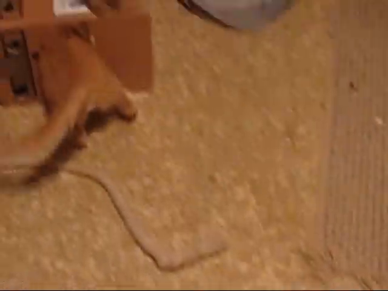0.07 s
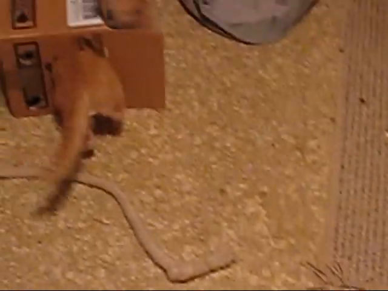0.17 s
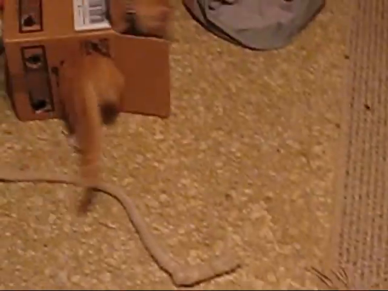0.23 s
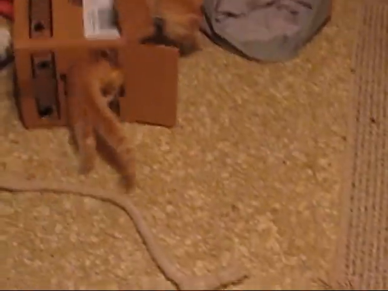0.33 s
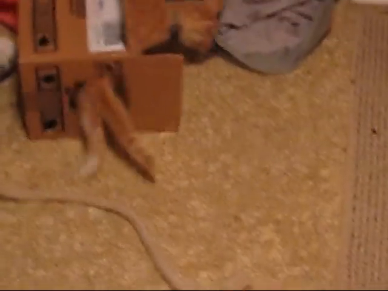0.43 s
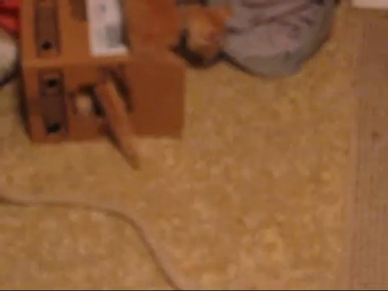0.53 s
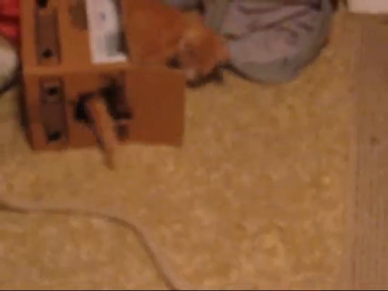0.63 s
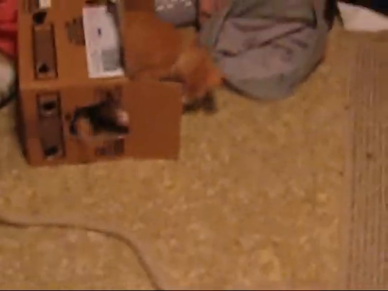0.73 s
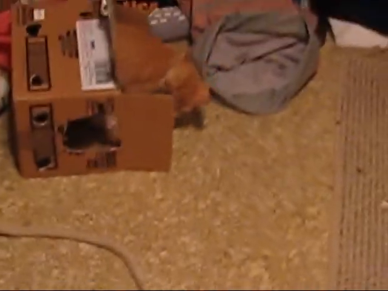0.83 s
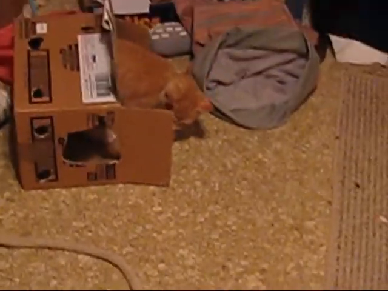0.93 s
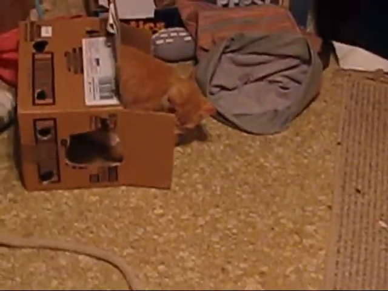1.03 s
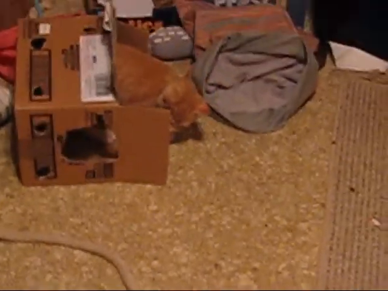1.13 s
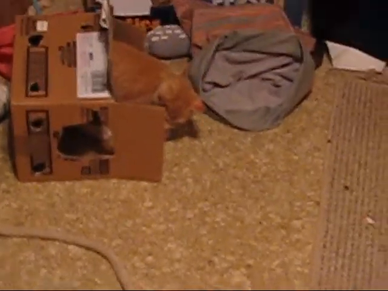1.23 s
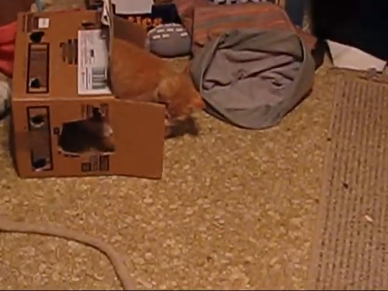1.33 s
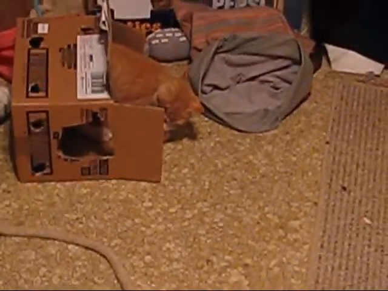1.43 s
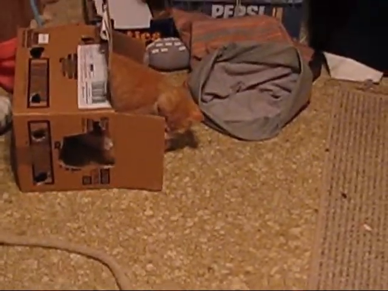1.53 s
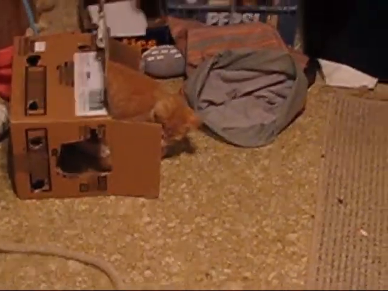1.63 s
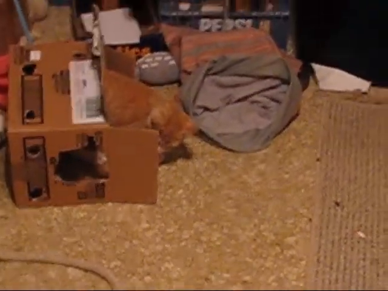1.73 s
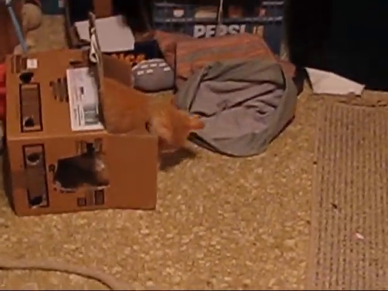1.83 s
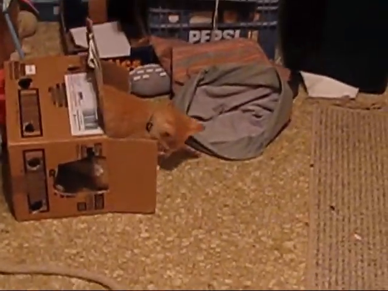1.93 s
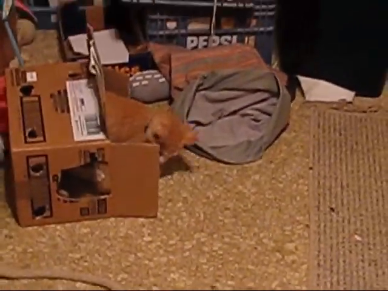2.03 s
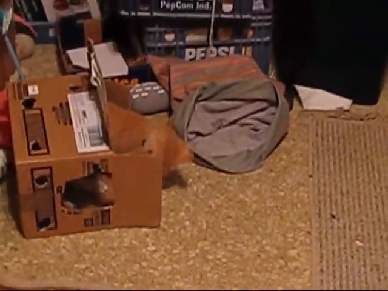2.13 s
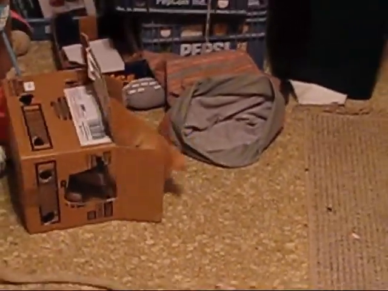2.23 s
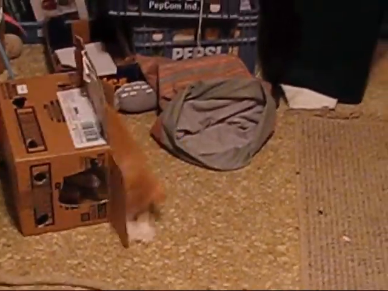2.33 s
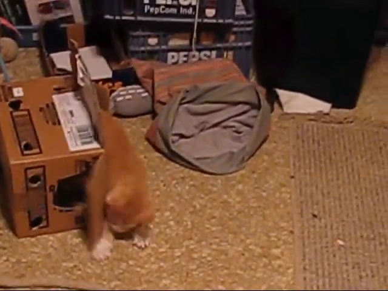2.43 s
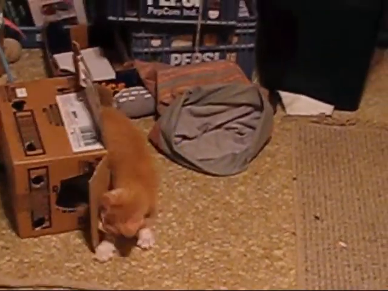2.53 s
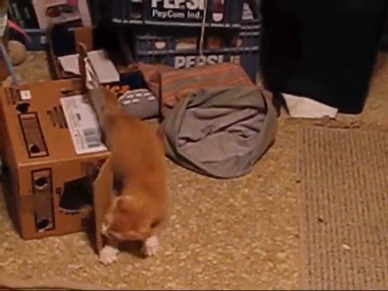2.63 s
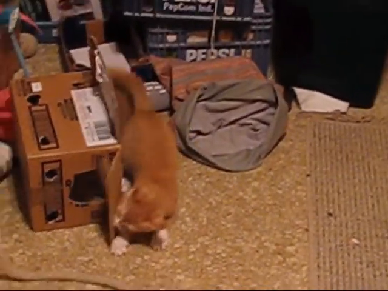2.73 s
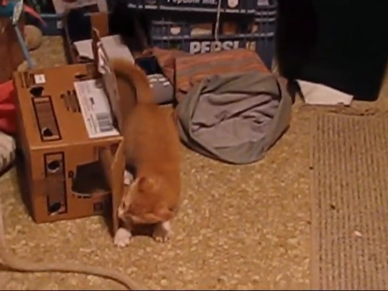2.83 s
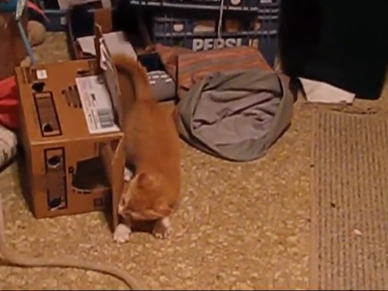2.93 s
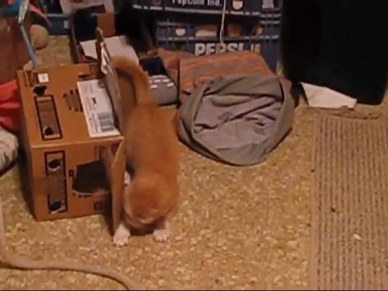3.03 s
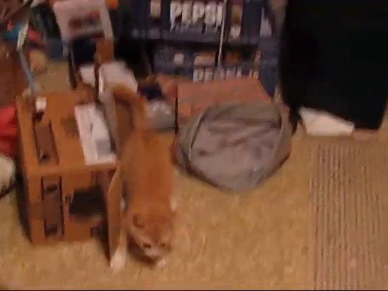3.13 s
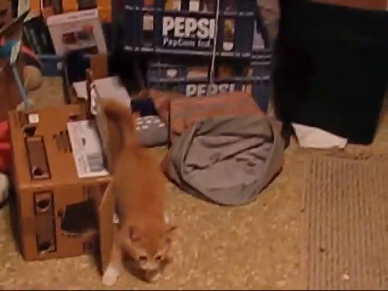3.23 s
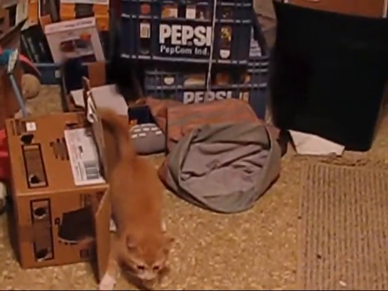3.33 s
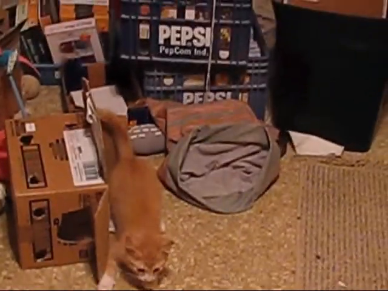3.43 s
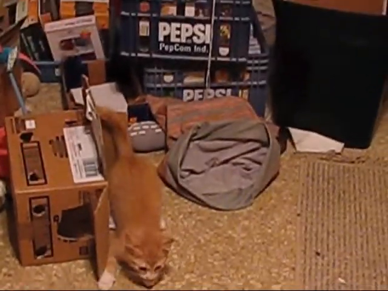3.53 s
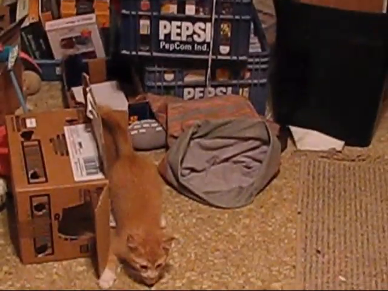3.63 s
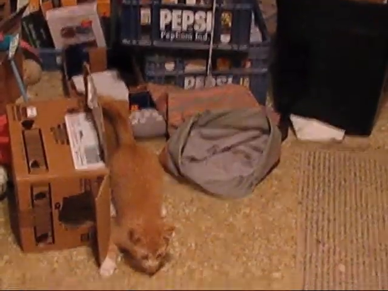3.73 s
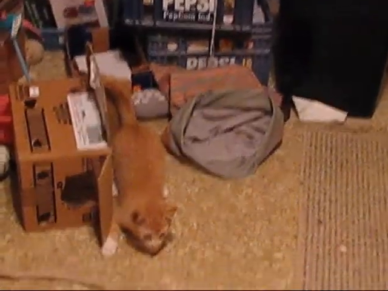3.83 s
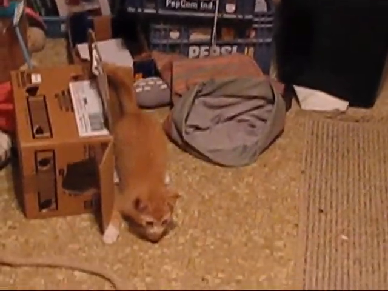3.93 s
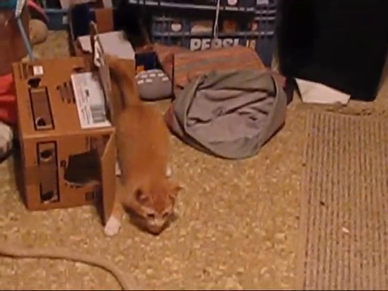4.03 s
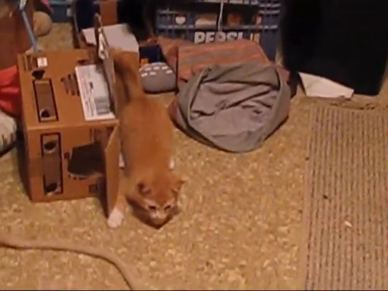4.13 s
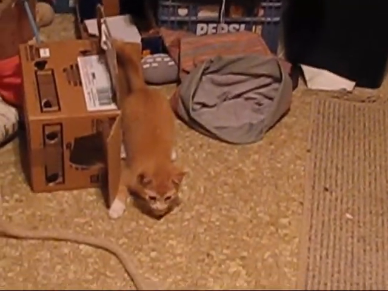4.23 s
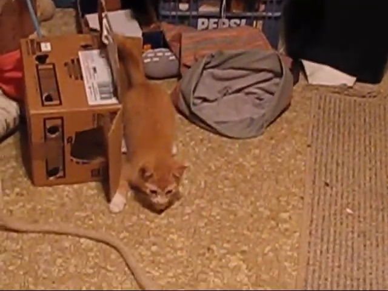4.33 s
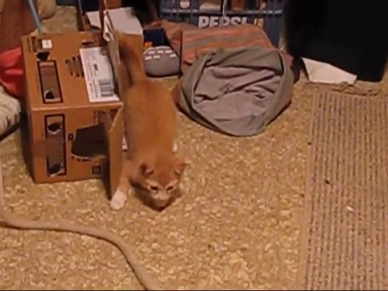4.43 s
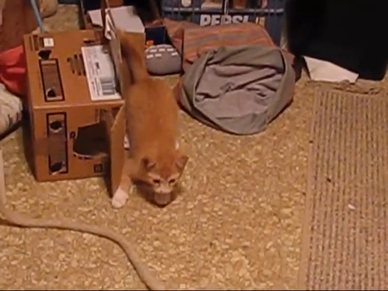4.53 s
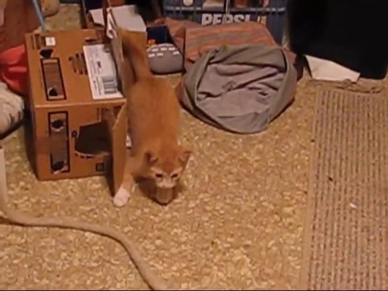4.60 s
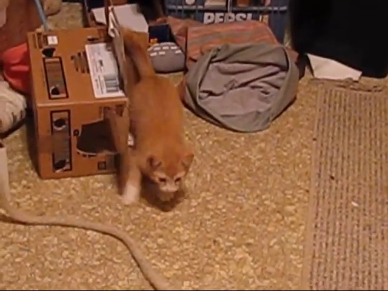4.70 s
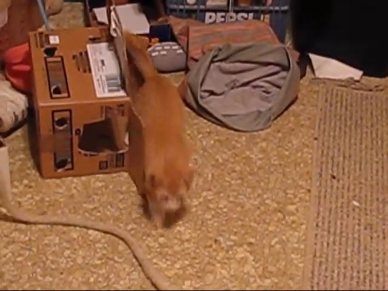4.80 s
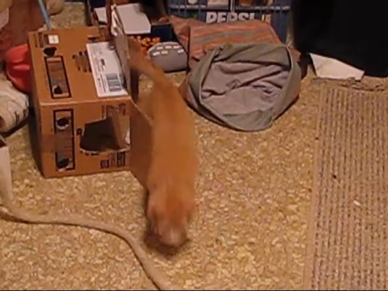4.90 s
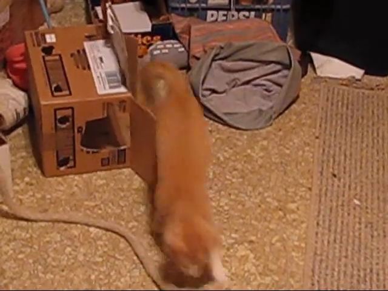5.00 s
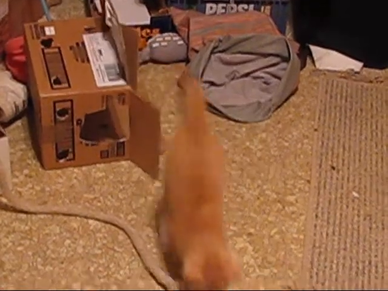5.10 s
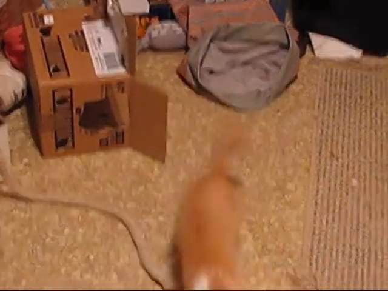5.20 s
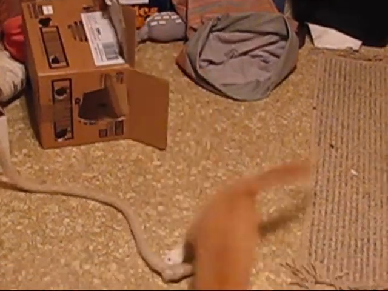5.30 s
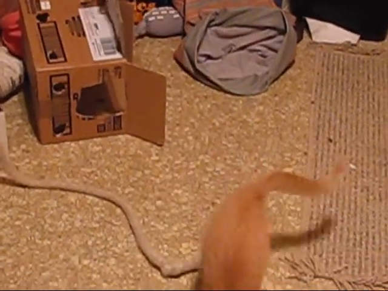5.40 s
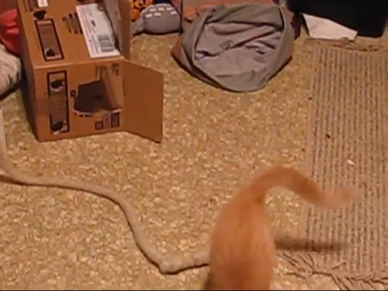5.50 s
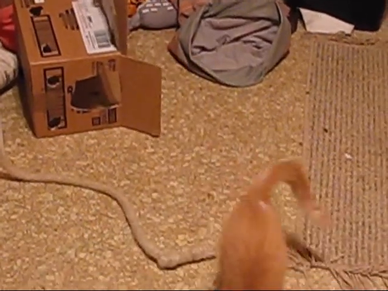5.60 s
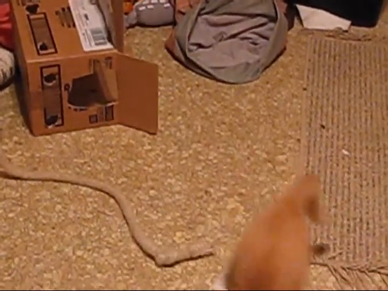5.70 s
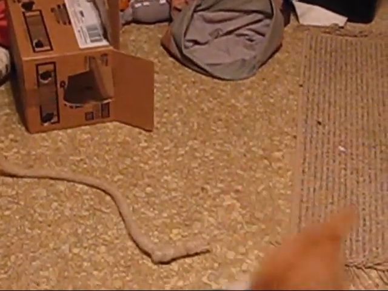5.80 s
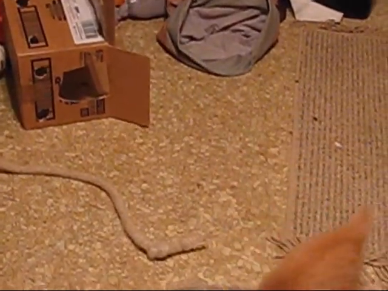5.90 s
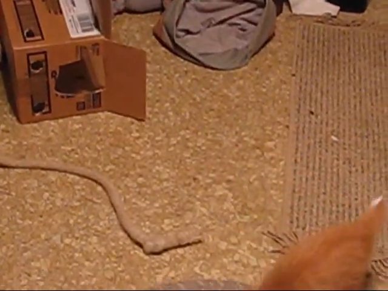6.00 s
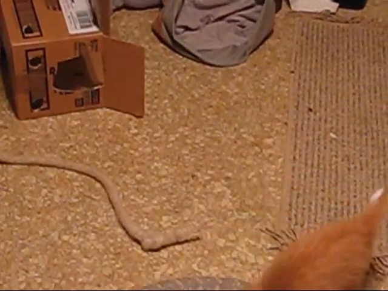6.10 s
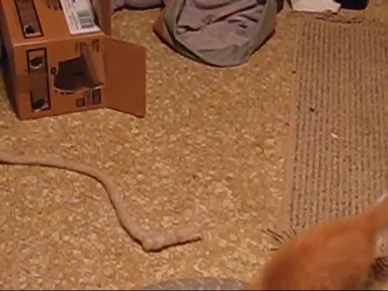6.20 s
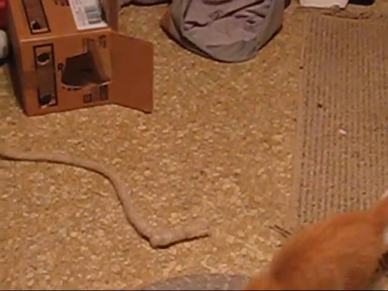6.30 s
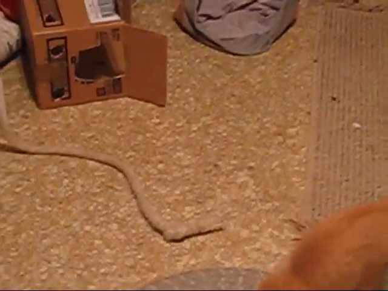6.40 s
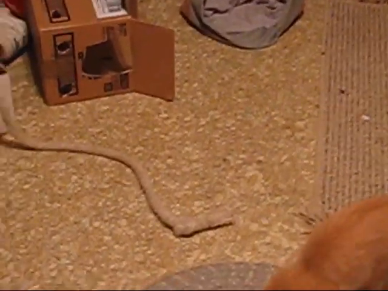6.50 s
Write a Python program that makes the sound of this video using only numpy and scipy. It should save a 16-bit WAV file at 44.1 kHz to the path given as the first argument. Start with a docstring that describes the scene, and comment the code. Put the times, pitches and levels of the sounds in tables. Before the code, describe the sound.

Kitten scrabbling through a hollow cardboard box, soft thuds, a sharp flap slap, scratchy claws, then a landing knock and faint metal jingle in a humming room.

```python
"""Kitten in a cardboard box

A kitten dives through a cardboard box on carpet, knocks and scrapes past its flap, then pounces
towards the camera. Struck panels and flap ring as sums of decaying modes; claws and fur are random slips
filtered by the board. A small metal piece, perhaps on the collar, tinkles as a wavering tone.
Beneath lie an appliance motor's sine lines, filtered noise for the quiet room and a thin camera whine.
"""
import sys
import numpy as np
from scipy import signal
from scipy.fft import rfft, irfft
from scipy.io import wavfile

SR = 44100
rng = np.random.default_rng(int(sys.argv[2]) if len(sys.argv) > 2 else 0)


def transcribe(signal):
    """Save signal, clipped to [-1, 1], as a 16-bit WAV file at the path in sys.argv[1]."""
    frames = np.atleast_2d(signal).T
    limited = np.clip(frames, -1, 1)
    pcm = np.round(limited * 32767).astype(np.int16)
    wavfile.write(sys.argv[1], SR, pcm)


N = 288855
TIME = np.arange(N) / SR
FREQUENCY = np.fft.rfftfreq(N, 1 / SR)


def gain_of(db):
    """Logarithmic level: decibels become an amplitude factor."""
    return 10 ** (np.asarray(db) / 20)


def evened(x):
    """Power normalisation: the signal is scaled to rms 1."""
    return x / np.sqrt(np.mean(x ** 2) + 1e-20)


def read(points, hz):
    """Logarithmic pitch scale: a table is interpolated along log frequency."""
    point_hz, value = np.transpose(points)
    return np.interp(np.log(hz + 1), np.log(point_hz + 1), value)


def fade(t, t60):
    """Exponential decay: the level falls by 60 dB in t60 seconds."""
    return np.exp(-np.log(1000) * t / t60)


def add(mix, start_s, sound, pan_db=0):
    """Superposition: a sound is added to the stereo mix, panned by a level difference."""
    part = mix[:, max(round(start_s * SR), 0):][:, :len(sound)]
    sides = gain_of([[pan_db / 2], [-pan_db / 2]])
    part += sides * sound[:part.shape[1]]


def colour(x, points):
    """Linear filtering: each frequency is weighted by a smooth spectrum."""
    return irfft(rfft(x) * gain_of(read(points, FREQUENCY)), N)


def resonate(x, peaks):
    """Forced resonance: parallel resonators answer one driving signal."""
    out = np.zeros_like(x)
    for pitch_hz, width_hz, level_db in peaks:
        b, a = signal.iirpeak(pitch_hz, pitch_hz / width_hz, SR)
        out += gain_of(level_db) * signal.lfilter(b, a, x)
    return out


def ring(modes, size=16000):
    """Modal superposition: a struck body rings freely as a sum of decaying sines."""
    t = np.arange(size) / SR
    out = np.zeros(size)
    for pitch_hz, level_db, t60_s in modes:
        out += gain_of(level_db) * fade(t, t60_s) * np.sin(2 * np.pi * pitch_hz * t)
    return out


def wander(cutoff_hz):
    """Low-passed randomness: a smooth random curve of rms 1."""
    smooth = np.exp(-(FREQUENCY / cutoff_hz) ** 2)
    return evened(irfft(rfft(rng.standard_normal(N)) * smooth, N))


def grains(per_s, spread_db):
    """Stick-slip friction: tiny slips of uneven size fall at random moments."""
    size = gain_of(spread_db * np.minimum(rng.exponential(1, N), 4))
    occurs = rng.random(N) < per_s / SR
    return size * rng.standard_normal(N) * occurs


def stroke(t, length, rise_s, release_s):
    """Exponential approach and release: a contact builds up, holds and lets go."""
    return (1 - np.exp(-t / rise_s)) * np.exp(-np.maximum(t - length, 0) / release_s)


def efforts(rows, rise_s, release_s):
    """Superposition of envelopes: a run of strokes forms one curve of strength."""
    out = np.zeros(N)
    for start_s, length_s, level_db in rows:
        t = np.maximum(TIME - start_s, 0)
        out += gain_of(level_db) * stroke(t, length_s, rise_s, release_s)
    return out


# Likeness of diffuse sound at the two ports: pitch_hz [Hz], left_right_likeness [0 to 1]
LIKENESS = [(60, 1), (300, 1), (700, 0.78), (1500, 0.5), (2500, 0.21), (3300, 0.081), (4200, 0.61),
            (7000, 1)]


def ports(a, b):
    """Spatial coherence: two close microphone ports hear diffuse sound partly alike."""
    same = np.clip(read(LIKENESS, FREQUENCY), 0, 1)
    mid = irfft(rfft(a) * np.sqrt((1 + same) / 2), N)
    side = irfft(rfft(b) * np.sqrt((1 - same) / 2), N)
    return np.array([mid + side, mid - side])


# Resonances of the struck cardboard: pitch_hz [Hz], width_hz [Hz], level_db [dB]
BOARD_RESONANCES = [(333, 48, 25), (540, 320, 14.5), (870, 270, 8), (1440, 37, -7), (1890, 45, 11),
                    (2410, 300, 6.5), (3980, 580, 8)]


def knock(low_hz, high_hz, t60, scatter=1.4, size=8000):
    """Impulse excitation: a click, then bending waves that scatter and die in the board."""
    waves = rng.standard_normal(size) * fade(np.arange(size) / SR, t60)
    waves *= scatter / np.linalg.norm(waves)
    waves[0] -= 1  # the click
    waves = signal.lfilter(*signal.butter(2, low_hz, "high", fs=SR), waves)
    waves = signal.lfilter(*signal.butter(3, high_hz, fs=SR), waves)
    waves += resonate(waves, BOARD_RESONANCES)
    return waves / np.linalg.norm(waves) * np.sqrt(0.0032 * SR)  # energy of rms 1 lasting 3.2 ms


# Stereo lean of the blows over time: time_s [s], left_minus_right_db [dB]
STEREO_LEAN = [(.6, -1), (1.1, -6.5), (3.2, -4.5), (4.9, -0.5), (5.3, -12)]


def lean_at(s):
    """Level difference: interpolated left-right dB given to a blow at this moment."""
    return np.interp(s, *np.transpose(STEREO_LEAN))


# Motor hum lines: pitch_hz [Hz], level_db [dB rms before the drift]
HUM_LINES = [(59.2, -38.5), (91.8, -48.5), (118.5, -48.5), (182.5, -50.5), (185.6, -47.5), (236.6, -50),
             (259, -56), (413, -59.5), (472, -63), (591, -63.5), (1414, -70), (1534, -62), (1653, -63.5),
             (1771, -68.5)]
# Hum level over time: time_s [s], level_db [dB]
HUM_LEVEL = [(0, 1.5), (1.2, 1), (2.2, 1), (3.5, 0), (6.55, 0)]
# Spectrum of the rush of air: pitch_hz [Hz], level_db [dB, relative]
AIR_SPECTRUM = [(20, -3.5), (45, 2.5), (100, 0), (170, 2), (270, 0.5), (330, -3.5), (410, -3), (600, -10.5),
                (1100, -12), (1600, -12.5), (3000, -18), (5000, -19.5), (9000, -28), (12000, -31)]


def background(air_db=-41.5, lead_s=.00007, whine_hz=7867.2, frame_hz=29.97, whine_db=-61.5):
    """Steady tones and broadband noise: wavering hum, a rush of air and the camera's whine."""
    hum = np.zeros(N)
    for pitch_hz, level_db in HUM_LINES:
        turns = rng.random() + np.cumsum(pitch_hz + .3 * wander(cutoff_hz=3)) / SR
        hum += np.sqrt(2) * gain_of(level_db) * np.sin(2 * np.pi * turns)
    drift_db = np.interp(TIME, *np.transpose(HUM_LEVEL))
    hum *= gain_of(drift_db + .5 * wander(cutoff_hz=5))
    rush = [evened(colour(noise, AIR_SPECTRUM)) for noise in rng.standard_normal((2, N))]
    air = hum + gain_of(air_db) * ports(*rush)
    lead = np.gradient(air.mean(0)) * SR * lead_s / 2  # hum and air reach the left port first
    frame_time = TIME % (1 / frame_hz)  # the whine restarts with every frame
    whine = np.sqrt(2) * gain_of(whine_db) * np.sin(2 * np.pi * whine_hz * frame_time)
    return air + np.array([lead, -lead]) + whine


# The body moves along box or carpet: start_s [s], length_s [s], level_db [dB]
BODY_PASSES = [(0, .12, -40), (.19, 0.26, -41), (.54, 0.11, -47), (.725, .07, -41.5), (.87, 0.06, -44),
               (1.05, 0.39, -54.5), (1.64, .06, -51), (2.256, 0.086, -35.5), (2.42, .31, -41.5),
               (4.87, 0.17, -45.5), (5.29, 0.07, -48)]
# Hiss of sliding contact: pitch_hz [Hz], level_db [dB, relative]
FRICTION_SPECTRUM = [(100, -26), (400, -15), (900, -3), (1500, 2), (2600, 5), (4000, 2.5), (5500, 3),
                     (7000, 0.5), (9500, -1), (12000, -7.5)]
# Resonances of the flap under friction: pitch_hz [Hz], width_hz [Hz], level_db [dB]
FLAP_RESONANCES = [(1414, 63, -4), (1795, 360, 3.5), (2112, 54, 9), (2660, 240, 4), (3010, 72, 1.5),
                   (3250, 130, -9)]
# Low response of the panel beneath: pitch_hz [Hz], level_db [dB, relative]
PANEL_SPECTRUM = [(80, -3), (180, 7), (420, 10), (700, 3), (1100, -8.5), (1800, -20), (5000, -73)]


def brushing(flap_db=-6, body_db=-5, uneven_db=2, rise_s=0.0075, release_s=0.06):
    """Sliding friction: fur drags along the walls in dense fine slips and a few crackles."""
    slips = evened(grains(per_s=9000, spread_db=2.5))
    slips += .55 * evened(grains(per_s=220, spread_db=2))  # crackles of the board
    fur = evened(colour(slips, FRICTION_SPECTRUM))
    fur += gain_of(flap_db) * evened(resonate(slips, FLAP_RESONANCES))
    fur += gain_of(body_db) * evened(colour(slips, PANEL_SPECTRUM))
    strength = efforts(BODY_PASSES, rise_s, release_s)
    return evened(fur) * strength * gain_of(uneven_db * wander(cutoff_hz=39))


# Claws and fur slide over board or carpet:
# start_s [s], length_s [s], level_db [dB], low_body_db [dB against the hiss]
SLIDES = [(0.023, 0.059, -39, 1.5), (0.094, 0.026, -38.5, 3), (0.181, .012, -34.5, -11),
          (0.298, 0.047, -39.5, -10), (.35, 0.067, -38, 1), (.421, .011, -32.5, 6),
          (0.508, 0.026, -31.5, 5), (0.751, 0.029, -39, -22), (2.255, .003, -37.5, -10),
          (2.348, 0.0069, -33.5, 11), (2.5615, 0.0026, -35, -16), (2.574, .011, -45, -12),
          (2.676, 0.033, -33, -4.5), (2.735, 0.0096, -29, -5), (4.875, .035, -47, 6),
          (4.953, 0.093, -41, -3), (4.999, 0.021, -33.5, -21), (5.313, .008, -41, 11),
          (5.617, 0.008, -40.5, -14), (6.327, .005, -48, -10)]
# The flap rings strongly only while the kitten leans on it.
LEAN_FROM_S, LEAN_UNTIL_S = 2.5, 2.9
FLAP_NEAR_DB, FLAP_FAR_DB = 7.5, -5.5


def scrapes(rise_s=0.0016, release_s=0.0091, bite=0.29, bite_s=0.0011, swell=0.094, firm_db=-36):
    """Stick-slip excitation: strokes bite, then hiss, ring the flap and shake the panel."""
    slips = grains(per_s=8000, spread_db=1.5)
    slips *= gain_of(2 * wander(cutoff_hz=88))  # claws catch and let go in clumps
    hiss = evened(colour(slips, FRICTION_SPECTRUM))
    flap = evened(resonate(slips, FLAP_RESONANCES))
    body = evened(colour(slips, PANEL_SPECTRUM))
    out = np.zeros((2, N))
    for start_s, length_s, level_db, body_db in SLIDES:
        flap_db = FLAP_NEAR_DB if LEAN_FROM_S < start_s < LEAN_UNTIL_S else FLAP_FAR_DB
        at = np.flatnonzero((TIME >= start_s) & (TIME < start_s + length_s + .1))
        t = TIME[at] - start_s
        # Long, light strokes build up slowly.
        swell_s = rise_s + swell * length_s * gain_of(firm_db - level_db)
        press = stroke(t, length_s, swell_s, release_s) * (1 + bite * np.exp(-t / bite_s))
        sound = hiss[at] + gain_of(flap_db) * flap[at] + gain_of(body_db) * body[at]
        add(out, start_s, gain_of(level_db) * press * sound)
    return out


# Soft pushes on the panels: start_s [s], level_db [dB], favoured_hz [Hz, by the place of the push],
# spread_octaves [octaves], free_s [s until the kitten's body damps it]
PUSHES = [(.06, -27, 170, .3, .07), (0.351, -20.5, 487, 0.13, .03), (.431, -26, 1000, .2, .04),
          (0.4596, -14.5, 168, .3, .023), (.522, -20, 420, .25, .03), (0.541, -19.5, 170, .3, .024),
          (0.598, -17.5, 300, 1.28, 0.036), (.908, -31, 310, .2, .05), (2.67, -18.5, 391, .15, .03),
          (4.889, -20.5, 1000, .3, .02)]
# Modes of the box panels: pitch_hz [Hz], level_db [dB, relative], t60_s [s]
PANEL_MODES = [(96.5, 1, 0.23), (169, 0, 0.16), (315, 1, 0.046), (406, 0.5, 0.067), (460, -1.5, 0.094),
               (614, -3, 0.068), (985, -3.5, .08)]
PUSH_S = 0.0014  # time constant of a soft contact's onset


def booms(damping_s=.004):
    """Selective modal excitation: a push favours nearby modes until the body damps them."""
    out = np.zeros((2, N))
    for start_s, level_db, favoured_hz, octaves, free_s in PUSHES:
        boom = 0
        for mode in PANEL_MODES:
            distance = np.log2(mode[0] / favoured_hz) / octaves
            boom = boom + np.exp(-distance ** 2) * ring([mode])
        boom *= stroke(TIME[:len(boom)], free_s, PUSH_S, damping_s)
        add(out, start_s, gain_of(level_db) * boom, lean_at(start_s))
    return out


# Paws and flank knock the box or the floor: start_s [s], level_db [dB],
# contact_hz [Hz, upper limit of the first touch], t60_s [s], patter_s [s]
PAW_KNOCKS = [(.103, -20.5, 9300, 0.018, 0), (0.369, -36, 9000, 0.02, 0), (.4231, -28.5, 700, .055, 0),
              (0.5115, -25.5, 2620, 0.043, .031), (.795, -31, 790, .066, 0), (.908, -31, 600, 0.073, 0),
              (1.0855, -29.5, 3630, 0.04, 0), (1.3007, -31, 2520, .06, 0.027),
              (1.372, -30.5, 2800, 0.044, 0.018), (1.6154, -27, 2410, .026, 0.00026),
              (1.6649, -27, 2490, 0.033, 0.053), (2.448, -30.5, 3620, 0.032, 0),
              (3.1768, -32.5, 1960, 0.057, .041), (4.173, -39, 4000, .05, 0),
              (4.888, -24.5, 2300, 0.071, .011), (5.349, -35.5, 900, .067, 0),
              (5.6136, -30, 1040, 0.024, 0), (6.458, -34.5, 890, 0.021, 0)]
# Air resonance in the box: pitch_hz [Hz], level_db [dB against the knock], t60_s [s]
BOX_AIR = [(333, -15, 0.15)]


def knocks(gap_s=.02, touch_db=-1.5, touch_dulling=0.85):
    """Contact stiffness sets bandwidth: touches patter, and ring the air inside the box."""
    out = np.zeros((2, N))
    for start_s, level_db, contact_hz, t60_s, patter_s in PAW_KNOCKS:
        touches = 1 + round(abs(patter_s) / gap_s)
        for k, at in enumerate(np.linspace(start_s, start_s + patter_s, touches)):
            high_hz = contact_hz * touch_dulling ** k  # each further touch is softer
            gain = gain_of(level_db + k * touch_db)  # and weaker
            low_hz = 400 * (high_hz / 2300) ** .55  # a harder contact moves a smaller patch
            add(out, at, gain * knock(low_hz, high_hz, t60_s), lean_at(at))
            if at < SLAP_S:  # the kitten is still inside
                add(out, at, gain * ring(BOX_AIR))
    return out


# Fur passes an edge: middle_s [s], half_length_s [s, to 1/e], level_db [dB]
FUR_SWISHES = [(0.41, .022, -38), (0.609, 0.0073, -38.5), (0.88, 0.008, -40.5), (1.67, 0.038, -47),
               (2.6, .02, -43), (4.812, .012, -45), (5.107, .012, -48)]


def swishes(low_hz=6000):
    """High-passed random impulses: single hairs flick off the board in a soft fizz."""
    flicks = grains(per_s=14000, spread_db=3.5)
    fizz = signal.lfilter(*signal.butter(2, low_hz, "high", fs=SR), flicks)
    strength = np.zeros(N)
    for middle_s, half_length_s, level_db in FUR_SWISHES:
        strength += gain_of(level_db) * np.exp(-((TIME - middle_s) / half_length_s) ** 2)
    return evened(fizz) * strength


# Modes of the flap: pitch_hz [Hz], level_db [dB before the bass cut], t60_s [s]
FLAP_MODES = [(134, -36, 0.088), (189, -13.5, 0.076), (374, -16.5, 0.079), (493, -13.5, 0.085),
              (555, -21, 0.059), (772, -15, 0.057), (822, -24, .08), (1000, -25, 0.087), (1243, -23, .05)]
# Modes of the flap's stiff edge: pitch_hz [Hz], level_db [dB], t60_s [s]
EDGE_MODES = [(1950, -17, 0.0058), (2310, -8.5, 0.0068), (2640, -18, .014)]
SLAP_S = 2.3286  # the flap slaps once as the kitten jumps out


def slap(crack_db=-13.0, flex_db=-26, rebound_s=0.00052, lowest_hz=125):
    """Impact and modal radiation: the edge cracks, the panel springs back and shakes the box."""
    out = np.zeros((2, N))
    crack = knock(low_hz=860, high_hz=3100, t60=0.012, scatter=0.3)
    add(out, SLAP_S, gain_of(crack_db) * crack)
    add(out, SLAP_S, -ring(EDGE_MODES))
    bass_cut = signal.butter(2, lowest_hz, "high", fs=SR)  # a small panel radiates little bass
    panel = signal.lfilter(*bass_cut, ring(FLAP_MODES))
    flex = knock(low_hz=300, high_hz=800, t60=.08, scatter=3, size=len(panel))
    add(out, SLAP_S + rebound_s, panel + gain_of(flex_db) * flex)
    return out


# Each bound shakes the collar: start_s [s], length_s [s], level_db [dB, of the ring]
COLLAR_SHAKES = [(5.143, 0.013, -30), (5.168, 0.014, -40), (5.257, 0.018, -58), (5.279, 0.028, -38.5),
                 (5.341, 0.0093, -34), (5.36, 0.023, -52), (5.415, .02, -49), (5.942, 0.042, -50.5),
                 (6.163, .018, -56)]


def collar(tag_hz=5300, swell_s=.003, release_s=0.0062, waver_hz=28, chatter_db=-13, lead_s=0.013):
    """Frequency modulation: metal chatters on its link, then keeps up a thin, unsteady ring."""
    link = [(5500, 1100, 0)]  # pitch_hz [Hz], width_hz [Hz], level_db [dB]
    chatter = resonate(resonate(grains(per_s=4000, spread_db=2), link), link)
    pitch_hz = tag_hz + waver_hz * wander(cutoff_hz=197.7)
    tone = np.sin(2 * np.pi * np.cumsum(pitch_hz) / SR)
    shake = efforts(COLLAR_SHAKES, swell_s, release_s)
    early_shake = np.interp(TIME + lead_s, TIME, shake)  # chatter comes before the ring
    return shake * tone + gain_of(chatter_db) * early_shake * evened(chatter)


# Modes of the hollow landing knock: pitch_hz [Hz], level_db [dB before the soft onset], t60_s [s]
LANDING_MODES = [(635, -18, 0.023), (1045, -12.5, 0.025), (1280, -17, .028)]
LANDING_S = 5.3175  # the pounce ends


def landing():
    """Soft-contact modal excitation: a padded paw starts the hollow ring gently."""
    out = np.zeros((2, N))
    hollow = ring(LANDING_MODES)
    hollow *= 1 - np.exp(-TIME[:len(hollow)] / PUSH_S)
    add(out, LANDING_S, hollow, lean_at(LANDING_S))
    return out


# Reverberation of the room: pitch_hz [Hz], t60_s [s]
ROOM_DECAY = [(150, 0.3), (600, 0.23), (2500, 0.19), (10000, 0.2)]


def room(x, delay_s=0.0019, size=16000):
    """Diffuse reverberation: a carpeted, cluttered room with a frequency-dependent short tail."""
    hz, t, z = signal.stft(rng.standard_normal((2, size)), SR, nperseg=256)
    decay = fade(t, read(ROOM_DECAY, hz)[:, None])
    tails = signal.istft(z * decay, SR, nperseg=256)[1]
    tails *= np.clip(TIME[:tails.shape[1]] / delay_s - 1, 0, 1)  # silent at first, then ramps in
    echoes = [signal.fftconvolve(x, tail / np.linalg.norm(tail))[:N] for tail in tails]
    return ports(*echoes)


def scene(room_db=-9):
    """Superposition of direct, reverberant and background sound: kitten, box and humming room."""
    kitten = brushing() + scrapes() + booms() + knocks() + swishes() + slap() + collar() + landing()
    return kitten + gain_of(room_db) * room(kitten.mean(0)) + background()


# Stereo width: pitch_hz [Hz], gain_db [dB on left minus right]
SIDE_GAIN = [(55, -7), (120, 0), (200, -2.5), (500, -3.5), (900, 0.5), (2500, -1), (3800, -0.5),
             (4200, -40.5), (12000, -38)]


def record(dry, port_hz=3200, port_width_hz=800, port_db=-3, edge_hz=12150):
    """Port resonance, overload and band limit: stereo width nearly vanishes above the mid band."""
    mid, side = dry.mean(0), (dry[0] - dry[1]) / 2
    port = resonate(mid, [(port_hz, port_width_hz, port_db)])  # one port resonates
    side = colour(side - signal.hilbert(port).imag, SIDE_GAIN)  # a quarter turn out of phase
    clipped = np.clip([mid + side, mid - side], -1, 1)
    band_limit = signal.firwin(301, edge_hz, window=("kaiser", 8), fs=SR)
    return signal.oaconvolve(clipped, band_limit[None], "same")


dry = scene()
out = record(dry)
transcribe(out)
```